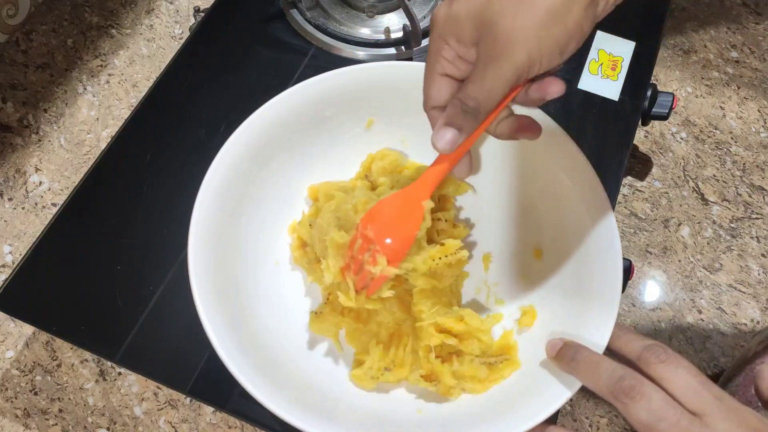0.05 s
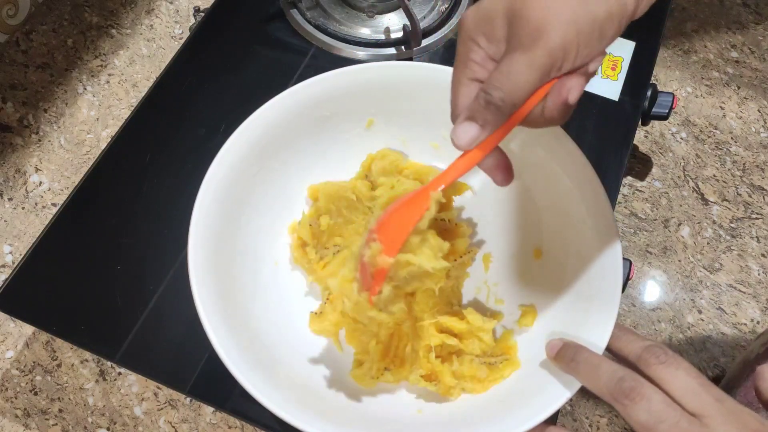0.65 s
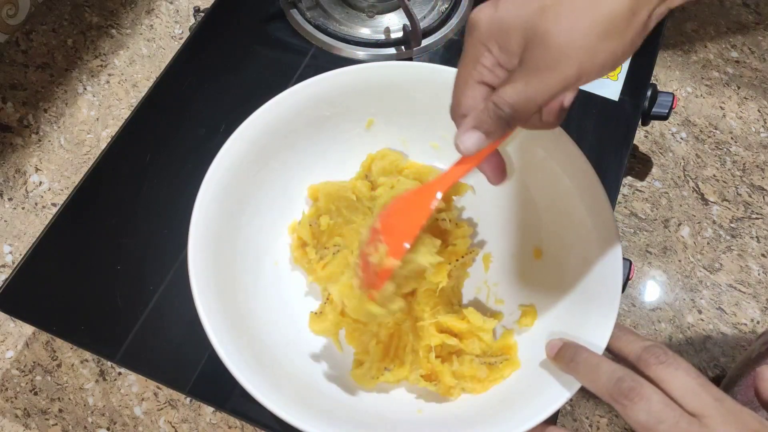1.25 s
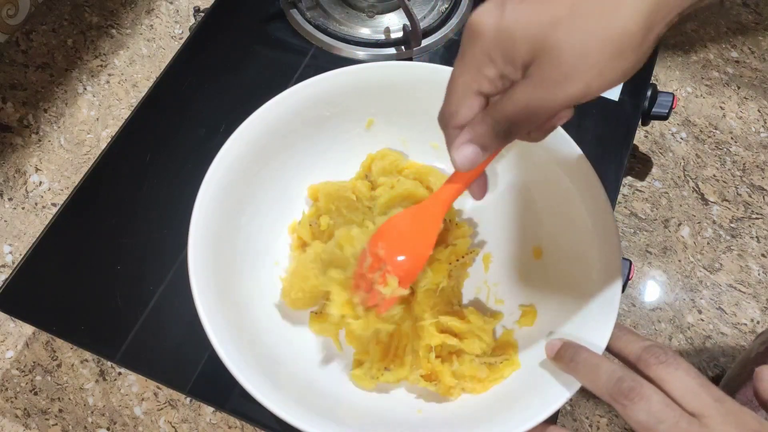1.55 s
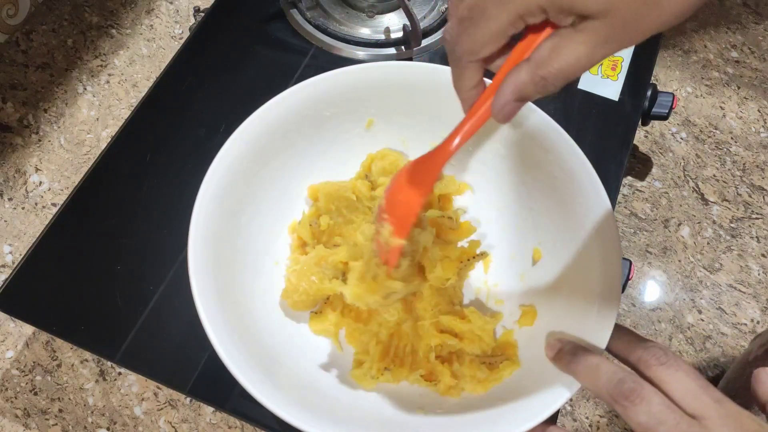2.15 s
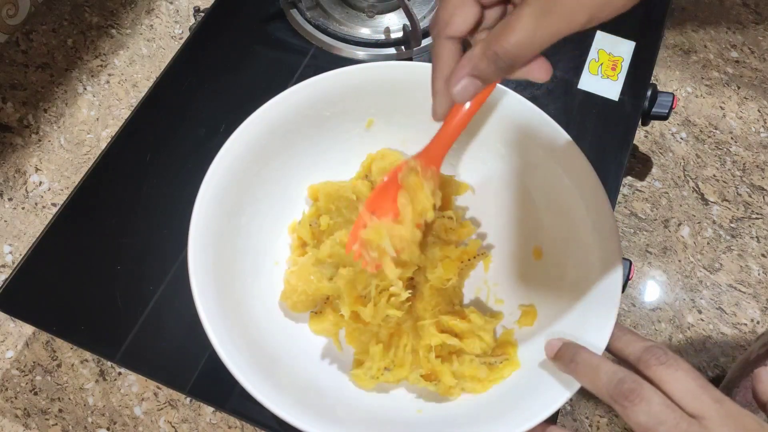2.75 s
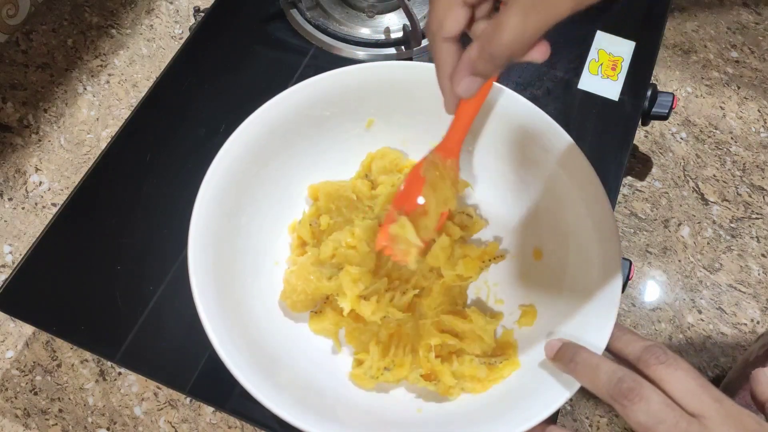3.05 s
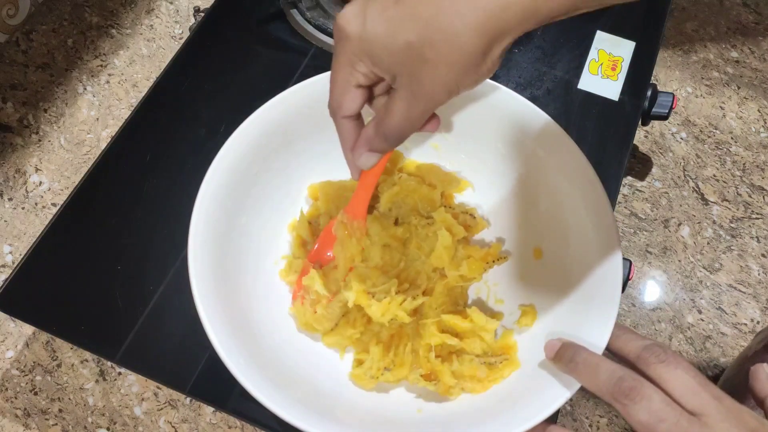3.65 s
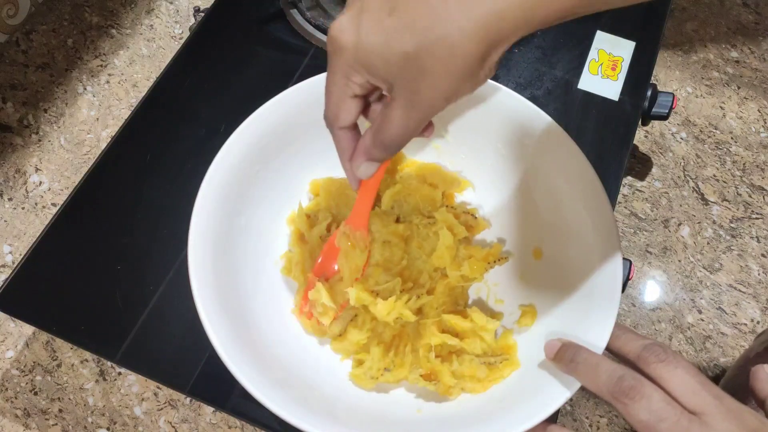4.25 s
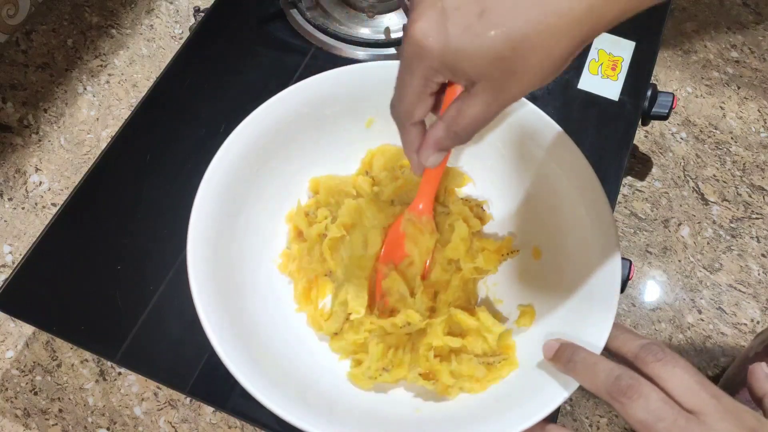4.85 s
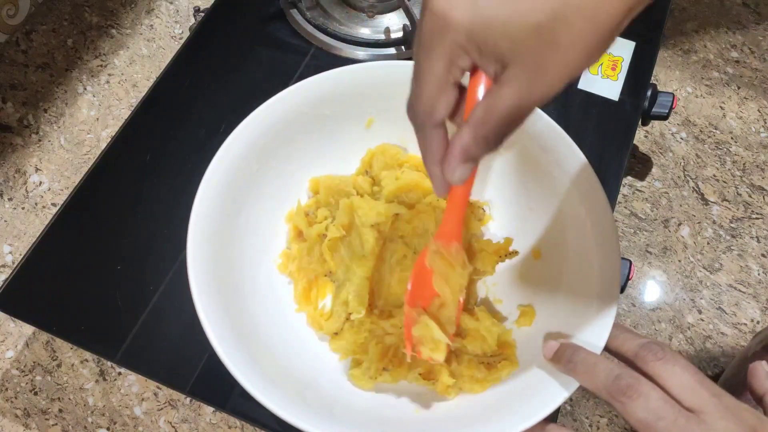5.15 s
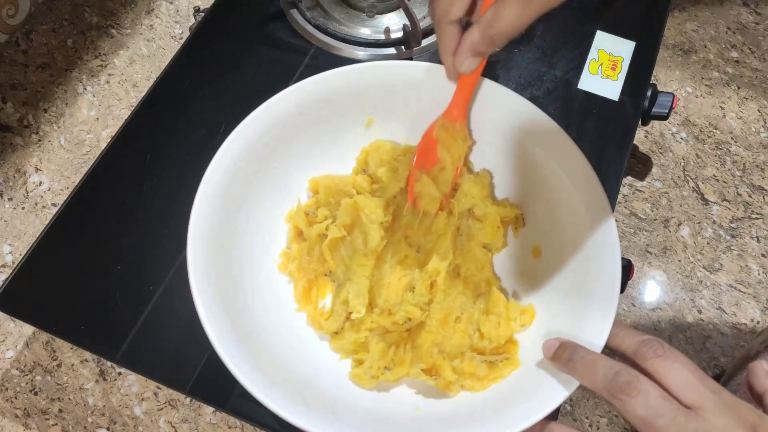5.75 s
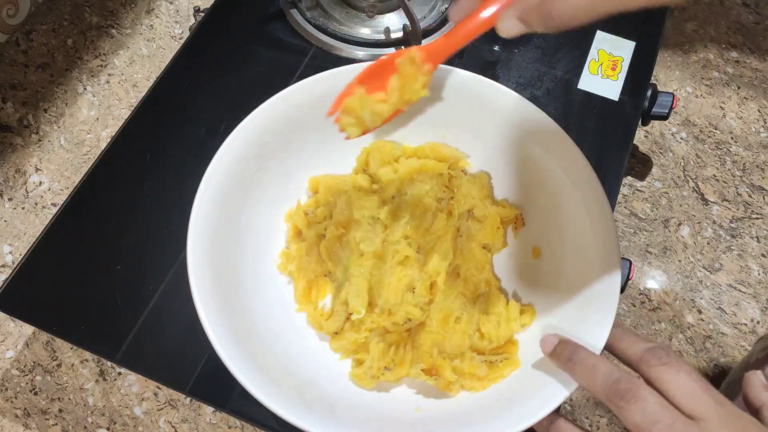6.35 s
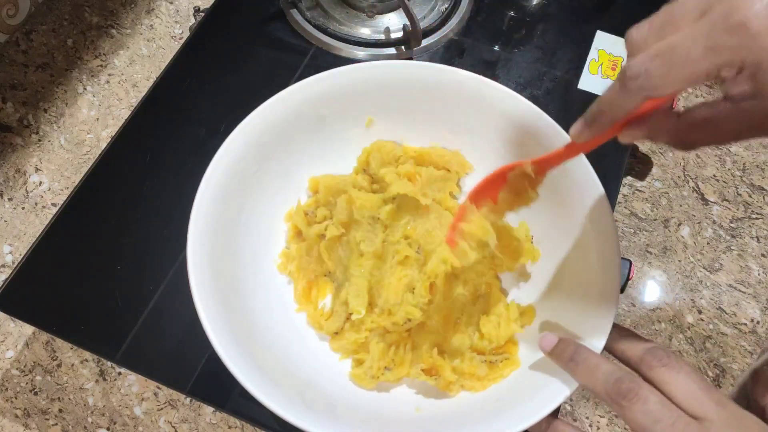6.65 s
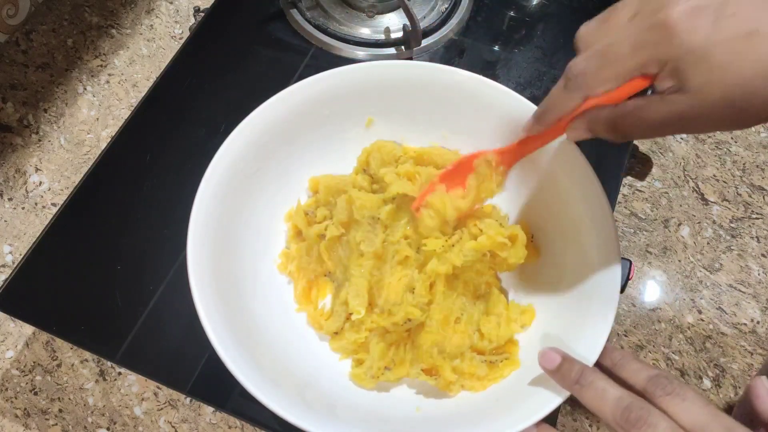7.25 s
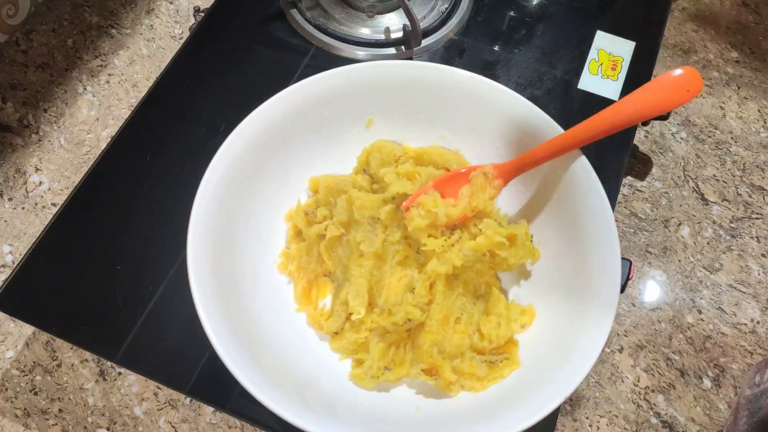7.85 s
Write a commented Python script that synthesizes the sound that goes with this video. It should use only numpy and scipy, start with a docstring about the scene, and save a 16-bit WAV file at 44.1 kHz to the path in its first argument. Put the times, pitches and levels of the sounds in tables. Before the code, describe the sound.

Soft fruit is mashed in a ceramic bowl with faint sticky squishes, a few dull bumps and a sharp clink near the end.

```python
"""Mashing banana in a small kitchen

Close on a wide ceramic bowl on a glass hob, heard through a phone's two microphones. A plastic spatula
works soft boiled banana: air pockets in the sticky pulp pop and crackle, the blade smears along the
glaze, and the bowl bumps on the hob. At the end the handle is let go and clinks on the rim.
A low appliance hum lies under it all."""
import sys
import numpy as np
from scipy import signal
from scipy.fft import rfft, irfft
from scipy.io import wavfile

SR = 44100
rng = np.random.default_rng(int(sys.argv[2]) if len(sys.argv) > 2 else 0)


def inscribe(sig):
    """Save sig as 16-bit PCM at rate SR to the path in sys.argv[1].

    A 1-D sig is mono; a 2-D sig holds one channel per row.
    Samples are clipped to [-1, 1] before scaling.
    """
    pcm = np.round(np.clip(np.atleast_2d(sig).T, -1, 1) * 32767)
    wavfile.write(sys.argv[1], SR, pcm.astype(np.int16))


N = 356352
TIME, TAIL = np.arange(N) / SR, np.arange(int(.6 * SR)) / SR
TOP_HZ = 15900

# Room tone. Each row: frequency in Hz, relative gain in dB.
ROOM_SPECTRUM = [(15, -11), (25, 1.5), (40, -2.5), (62, -9), (78, -11), (112, -13), (170, -30),
                 (250, -16.5), (310, -19.5), (430, -28.5), (700, -34.5), (1200, -36.5), (4000, -39.5),
                 (16000, -40.5)]
# The hum's rise and fall. Each row: time in seconds, relative level in dB.
HUM_LEVELS = [(0.0, -63), (1.15, -55), (2.48, -62.5), (3.8, -47.5), (4.45, -62), (5.83, -53), (8.06, -57),
              (8.08, -68)]
# The blade pressing the pulp. Each row: time it gives way in seconds, build-up in seconds,
# relative level in dB.
SQUEEZES = [(0.0, 0.079, -52), (.25, .17, -57.5), (1.06, 0.13, -67), (1.35, 0.16, -62), (1.55, .12, -62),
            (1.92, 0.058, -56.5), (2.7, 0.33, -69.5), (3.19, .11, -51.5), (3.69, .08, -66.5),
            (4.04, 0.068, -56), (4.51, 0.03, -61.5), (4.66, .03, -56.5), (5.19, 0.087, -52.5),
            (5.45, 0.036, -49), (5.6, 0.13, -54), (5.93, .07, -48.5), (6.73, 0.038, -54.5),
            (7.08, 0.52, -64.5), (7.45, 0.018, -61.5)]
# The larger air pockets. Each row: start in seconds, level in dB, snap pitch in Hz,
# hollow smack in dB against the snap.
LARGE_POPS = [(0.0831, -39, 10800, -21), (0.2117, -46, 12300, -13), (0.2428, -39.5, 8600, -43),
              (0.2804, -46, 9000, -27), (0.4593, -50, 12700, -24), (0.8735, -46.5, 12400, -34),
              (0.976, -47.5, 11800, -39), (1.3359, -44, 10200, -38), (1.4397, -42.5, 12500, -21),
              (1.525, -44, 10900, -26), (1.5558, -46.5, 12800, -14), (1.6402, -48, 10600, -34),
              (1.7747, -49, 9300, -13.5), (1.864, -46, 10700, -5.5), (2.0022, -41, 11600, -36),
              (2.3983, -54.5, 9500, -11), (2.5172, -51.5, 11700, -8), (2.6284, -44.5, 13400, -28),
              (2.711, -43.5, 13300, -30), (2.8482, -47, 12500, -32), (3.0333, -43.5, 10600, -4),
              (3.1838, -39.5, 11400, -12), (3.2077, -33, 10200, -9), (3.5108, -46, 10800, -19),
              (3.6413, -42.5, 13800, -23), (3.8527, -41.5, 10320, -20), (4.0083, -48, 9630, 7),
              (4.062, -44, 11200, -14), (4.387, -41.5, 9200, -33), (4.4034, -41.5, 11000, -38),
              (4.6352, -43.5, 10800, -30), (4.6416, -32, 9330, -23), (4.8876, -39.5, 10800, -54),
              (4.9379, -45.5, 10300, -4), (4.99, -40.5, 11200, -10), (5.0404, -42, 10700, -21),
              (5.077, -45, 10000, -13), (5.1846, -32, 9600, -1), (5.4366, -35, 10900, -14.5),
              (5.487, -38, 12480, -8), (5.5166, -31, 11600, -9), (5.5833, -34.5, 11400, -9.5),
              (5.615, -36.5, 10600, 15), (5.6302, -37.5, 9800, -3), (5.837, -40, 10250, -1),
              (5.9783, -34.5, 9100, -2.5), (6.2001, -51.5, 9100, -16), (6.271, -38.5, 11300, -13),
              (6.2802, -42.5, 11600, -21), (6.6727, -46, 10700, -12), (6.6952, -37, 10100, -20),
              (6.7272, -33.5, 9950, -13), (6.7786, -43.5, 10900, -27), (6.829, -41.5, 11400, -14),
              (7.191, -54.5, 11700, -8), (7.2355, -40.5, 11900, -17)]
# The blade dragged over the glaze. Each row: start and end in seconds, relative level in dB,
# blade resonance in Hz (higher when it scrapes on edge).
STROKES = [(1.693, 1.92, -73, 990), (2.528, 2.973, -77.5, 1710), (3.221, 3.715, -73, 1660),
           (3.714, 4.09, -72, 1700), (4.09, 4.55, -71, 1660), (4.565, 4.72, -72, 1680),
           (4.79, 5.23, -69, 1610), (5.372, 5.67, -71.5, 1800), (6.329, 6.57, -71.5, 1890),
           (6.652, 7.157, -63, 2598), (7.064, 7.133, -56.5, 2530), (7.428, 7.49, -64, 2430)]
# Pulp on glaze, coloured by blade and bowl. Each row: frequency in Hz, relative gain in dB.
SMEAR_SPECTRUM = [(120, -38), (330, 6.5), (500, -0.5), (670, -2.5), (850, -12), (1250, -6), (1600, -7),
                  (2560, -10), (3300, -19), (4470, -9.5), (5600, -15), (6720, -15), (9000, -7.5),
                  (16000, -20.5)]
# The bowl bumping the hob. Each row: start in seconds, rattle in dB, rattle cutoff in Hz,
# hollow ring in dB, boom in dB; the levels are relative.
BUMPS = [(1.775, -64, 900, -72, -52.5), (1.81, -64, 700, -70, -68), (3.151, -46, 1010, -61, -56),
         (3.19, -45.5, 940, -58, -48), (3.922, -54.5, 750, -62, -71), (5.064, -42.5, 820, -48, -58),
         (5.53, -56, 600, -80, -84), (5.864, -36.5, 1950, -44, -46), (5.9617, -29, 2800, -60, -84),
         (5.979, -34, 2060, -42, -36), (6.145, -69.5, 500, -77, -51), (7.3239, -34, 3880, -45.5, -47.5),
         (7.4979, -38, 3010, -45, -48.5), (7.562, -48.5, 2420, -57, -69), (7.786, -31.5, 2640, -51, -41.5)]
# The rattle of the hob's frame. Each row: frequency in Hz, relative gain in dB.
FRAME_SPECTRUM = [(60, -26), (110, 1.5), (180, -3), (260, -1.5), (480, -1.5), (950, 3), (1200, -3),
                  (2200, -2.5), (3500, -12), (6000, -3.5), (14000, -6)]
# The hob's modes. Each row: frequency in Hz, relative level in dB, 60 dB decay time in seconds.
HOB_MODES = [(105.8, -9.5, 0.39), (169, -6.5, 0.32), (234.2, -9, 0.67), (251.1, 8, 0.37), (342, -0.5, 0.22),
             (448, -18, 0.44), (623, -12.5, 0.51), (700, -5, 0.38), (790, -6.5, 0.26), (969, -5.5, 0.28),
             (1370, -18, .14), (1580, -17, 0.26)]
# The spatula ticking on the bowl, then its handle falling on the rim. Each row: start in seconds,
# relative tick level in dB, relative ring level in dB.
RIM_STRIKES = [(3.5724, -53.5, -83), (3.9, -53.5, -78), (7.6643, -29, -23), (7.674, -21.5, -35),
               (7.908, -56, -61), (8.0368, -51, -74), (8.0411, -39, -74), (8.077, -39, -69)]
# The plastic handle's clack. Each row: frequency in Hz, relative gain in dB.
CLACK_SPECTRUM = [(100, -19), (250, 0.5), (1200, -10), (2100, 6.5), (2900, 4), (3400, -6.5), (4400, 2.5),
                  (5900, -6.5), (8000, -3.5), (9300, -3.5), (12500, -8.5), (15000, -28)]
# The bowl's modes, some in beating pairs. Each row: frequency in Hz, relative level in dB,
# 60 dB decay time in seconds, left minus right in dB.
BOWL_MODES = [(1039, -21, .28, 0), (1812, -16, .15, -2), (1857, -9, .22, -2), (2066, -11, .14, -2),
              (2732, -10, .14, -3), (2750, -7, .24, -3), (3859, -14, .38, -3), (3885, -17, .2, -3),
              (5016, -11, .12, -3), (5131, 2, .14, -3), (5170, -9, .27, -3), (6587, -10, .3, 0),
              (6620, -17, .2, 0), (7459, -11, .1, 1), (8176, -6, .14, 1), (8235, -14, .15, 1),
              (9955, -9, .16, 1), (11600, -19, .13, 1), (11780, -17, .12, 1), (13880, -22, .1, 1)]


def undb(db):
    """Decibels to gain."""
    return 10 ** (np.asarray(db) / 20)


def unit(x):
    """Scale to rms 1."""
    return x / np.sqrt(np.mean(x ** 2))


def fade(t60):
    """A decay that loses 60 dB in t60 seconds."""
    return np.exp(-np.log(1000) * TAIL / t60)


def pan(db):
    """Left and right gains for a level difference."""
    return unit(undb(np.array([[db], [-db]]) / 2))


def add(out, start_s, sound):
    """Mix a short stereo sound in."""
    i = int(start_s * SR)
    out[:, i:i + sound.shape[1]] += sound[:, :max(N - i, 0)]


def colour(x, points, size=8192):
    """Minimum-phase filter of unit energy, shaped through (Hz, dB) points."""
    hz, db = np.transpose(points)
    f = np.maximum(np.fft.rfftfreq(size, 1 / SR), 1)
    cepstrum = irfft(np.log(undb(np.interp(np.log(f), np.log(hz), db))))
    cepstrum[1:size // 2] *= 2
    cepstrum[size // 2 + 1:] = 0
    response = irfft(np.exp(rfft(cepstrum)))
    return signal.fftconvolve(x, response[None] / np.linalg.norm(response), axes=1)[:, :x.shape[1]]


def lowpass(x, hz):
    """Second-order Butterworth low-pass."""
    return signal.sosfilt(signal.butter(2, hz, fs=SR, output="sos"), x)


def stereo_noise(count, alike_hz=620, bass_width=0.3):
    """Noise at two closely spaced microphones: alike in the bass, unrelated in the treble."""
    mid, side = rfft(rng.standard_normal((2, count)))
    f = np.fft.rfftfreq(count, 1 / SR)
    width = np.minimum(bass_width + (f / alike_hz) ** 2 / 2, 1)
    return irfft(np.array([mid + width * side, mid - width * side]) / np.sqrt(1 + width ** 2), count)


def reflections(x, near_t60=0.12, room_t60=0.3, each_db=-3, bounce=0.48, bounce_s=.002):
    """The echoes of x alone: quick ones off bowl and hob, longer ones off the tiled kitchen."""
    count = SR // 4
    decays = fade(near_t60)[:count], fade(room_t60)[:count]
    power = sum((undb(each_db) * decay) ** 2 / np.sum(decay ** 2) for decay in decays)
    echoes = rng.standard_normal((2, count)) * np.sqrt(power)
    # bounces off the bowl's wall comb the sound differently from every spot in the pulp
    for lag in rng.uniform(0, bounce_s, size=2):
        echoes = (echoes + bounce * np.roll(echoes, 1 + int(lag * SR), axis=1)) / np.hypot(1, bounce)
    return signal.fftconvolve(x, echoes, axes=1)


def wavering_tone(hz, waver_hz=4, depth=0.37):
    """A sine whose level and phase wander."""
    swell, drift = (depth * unit(lowpass(rng.standard_normal(N), waver_hz)) for _ in range(2))
    return unit((1 + swell) * np.sin(2 * np.pi * hz * TIME + drift))


def room_tone(room_db=-60, hum_hz=52.7, drone_hz=109, drone_db=-72):
    """The kitchen's rumble and hiss, with a low appliance hum and a fainter drone above it."""
    hum = wavering_tone(hum_hz) * undb(np.interp(TIME, *np.transpose(HUM_LEVELS)) - 3)
    drone = undb(drone_db) * wavering_tone(drone_hz)
    return undb(room_db) * unit(colour(stereo_noise(N), ROOM_SPECTRUM)) + pan(1) * (hum + drone)


def squeezing(release_s=0.029):
    """Strength of the crackle over time: each squeeze builds, then dies away as the pulp gives."""
    return np.max([undb(db) * np.exp(np.minimum((TIME - peak_s) / build_s, (peak_s - TIME) / release_s))
                   for peak_s, build_s, db in SQUEEZES], axis=0)


def pulp_crackle(gain_db=-5, per_s=300, size_db=0.5):
    """Tiny threads and bubbles break in the squeezed pulp, each a click."""
    sizes = undb(size_db * np.minimum(rng.exponential(size=N), 4)) * rng.choice([-1, 1], N)
    breaks = rng.random(N) < per_s / SR
    clicks = sizes * breaks * (1 + .5 * rng.standard_normal((2, N)))
    spectrum = [(500, -23), (2000, -19), (4000, -19.5), (9500, -9.5), (13000, -15), (16000, -11.5)]
    crackle = unit(colour(clicks, spectrum)) * squeezing() * undb(gain_db)
    return crackle + reflections(crackle)[:, :N]


def small_pockets(max_per_s=28, busy_db=-61, snap_hz=10600, spread_oct=0.14):
    """Rows as in LARGE_POPS: lesser pockets burst at random, oftener and louder under a hard squeeze."""
    step = SR // 100
    slots = np.arange(0, N, step)
    strength, chance = squeezing()[slots], rng.standard_normal((len(slots), 3))
    bursts = rng.random(len(slots)) < max_per_s * step / SR * np.minimum(strength / undb(busy_db), 1)
    db = np.minimum(20 * np.log10(strength + 1e-9) + 10, -46) + 2.5 * chance[:, 0]
    hz = snap_hz * 2 ** (spread_oct * chance[:, 1])
    smack_db = -11 + 6 * chance[:, 2]
    return np.transpose([slots / SR, db, hz, smack_db])[bursts]


def air_pops(rows, ring_s=0.00067, scatter=0.32, lag_s=0.000119, smack_hz=4860, echo_db=-1):
    """Each air pocket snaps open, rings briefly and smacks; the bowl scatters it to both microphones."""
    out, size, lead = np.zeros((2, N)), 512, 44
    f = np.maximum(np.fft.rfftfreq(size, 1 / SR), 1)
    for pop_s, db, snap_hz, smack_db in rows:
        scattered = scatter * rng.standard_normal((2, size)) * np.exp(-TAIL[:size] / ring_s)
        scattered[:, 0] += 1  # the direct path
        film_snap = np.exp(-(np.log2(f / snap_hz) / 0.52) ** 2)
        hollow_smack = undb(smack_db) * np.exp(-(np.log2(f / smack_hz) / 0.68) ** 2)
        broad_click = undb(-21) * f ** 2 / (f ** 2 + 1200 ** 2)
        delay_s = lead / SR + lag_s * rng.standard_normal() * np.array([[.5], [-.5]])
        burst = (film_snap + hollow_smack + broad_click) * (f < TOP_HZ) * np.exp(-2j * np.pi * f * delay_s)
        direct = unit(irfft(rfft(scattered) * burst)) * pan(2.5 * rng.standard_normal())
        gain = undb(db) * np.sqrt(2 * lead / size)  # level as rms over two milliseconds
        start = max(pop_s - lead / SR, 0)
        add(out, start, gain * direct)
        add(out, start, gain * undb(echo_db) * reflections(unit(irfft(burst))))
    return out


def blade_smears(gain_db=-1, rough_db=2.5, slip_hz=70, blade_q=4):
    """The blade slides in small uneven slips, swelling and easing each stroke, and resonates as it rubs."""
    rub = np.zeros((2, N))
    for start, end, db, blade_hz in STROKES:
        count = int((end - start) * SR)
        swell = undb(db) * np.sin(np.linspace(0, np.pi, count))
        slips = undb(gain_db + rough_db * unit(lowpass(rng.standard_normal(SR), slip_hz)))[:count]
        stroke = colour(unit(stereo_noise(SR))[:, :count] * slips * swell, SMEAR_SPECTRUM)
        resonance = signal.lfilter(*signal.iirpeak(blade_hz, blade_q, fs=SR), stroke)
        add(rub, start, stroke + resonance)
    return rub + reflections(rub)[:, :N]


def hob_bumps(rattle_t60=0.21, room_t60=0.7, swell_s=0.051, boom_below_hz=500):
    """The bowl's foot bumps the glass: the frame rattles and rings at once, the pane's boom follows."""
    out = np.zeros((2, N))
    for start, rattle_db, cutoff_hz, hollow_db, boom_db in BUMPS:
        rattle = stereo_noise(len(TAIL)) * (fade(rattle_t60) + undb(-14) * fade(room_t60))
        add(out, start, undb(rattle_db) * lowpass(colour(rattle, FRAME_SPECTRUM), cutoff_hz))
        boom = undb(boom_db + 3) * pan(1.4) * (1 - np.exp(-(TAIL / swell_s) ** 2))
        hollow = undb(hollow_db - 2) * pan(-0.72)
        for hz, mode_db, t60 in HOB_MODES:
            drive = boom if hz < boom_below_hz else hollow
            add(out, start, drive * undb(mode_db) * fade(t60) * np.sin(2 * np.pi * hz * TAIL))
    return out


def spatula_clinks(tick_t60=0.0018, clack_t60=0.074, room_t60=0.7, wet=.35):
    """Hard plastic strikes the rim: a tick, the handle's short clack and the bowl's pulp-damped ring."""
    out = np.zeros((2, N))
    phase = np.array([[0.79], [-0.79]])  # the modes reach the two microphones out of step
    ring = sum(undb(db) * pan(side_db) * fade(t60) * np.sin(2 * np.pi * hz * TAIL + phase)
               for hz, db, t60, side_db in BOWL_MODES)
    decay = fade(tick_t60) + undb(-4) * fade(clack_t60) + undb(-23) * fade(room_t60)
    for start, tick_db, ring_db in RIM_STRIKES:
        strike = colour(stereo_noise(len(TAIL)) * decay, CLACK_SPECTRUM)
        add(out, start, undb(tick_db) * pan(0.31) * strike)
        add(out, start, undb(ring_db - 2) * (ring + wet * reflections(ring)[:, :len(TAIL)]))
    return out


def scene():
    """Pulp, spatula, hob and room as they reach the microphones."""
    mashing = air_pops(LARGE_POPS) + pulp_crackle() + blade_smears() + hob_bumps() + spatula_clinks()
    return mashing + room_tone() + air_pops(small_pockets())


def record(dry):
    """The phone cuts the treble steeply above TOP_HZ."""
    return signal.sosfilt(signal.ellip(10, .2, 70, TOP_HZ, fs=SR, output="sos"), dry)


dry = scene()
out = record(dry)
inscribe(out)
```